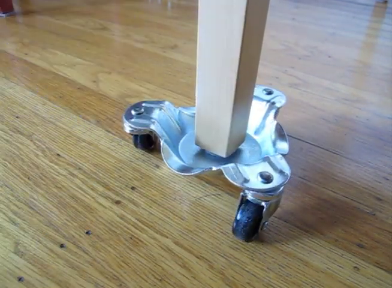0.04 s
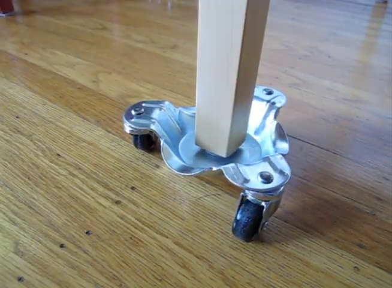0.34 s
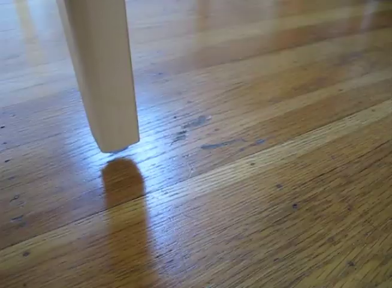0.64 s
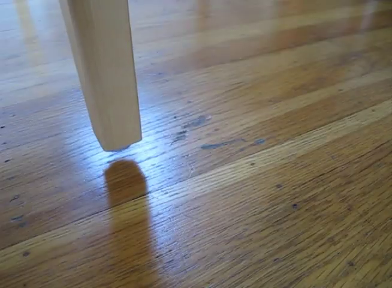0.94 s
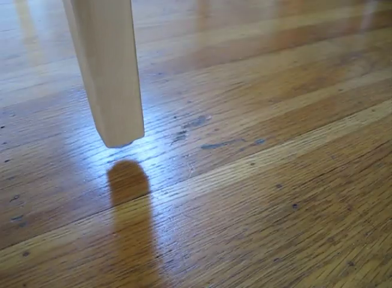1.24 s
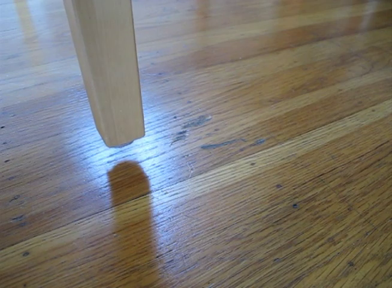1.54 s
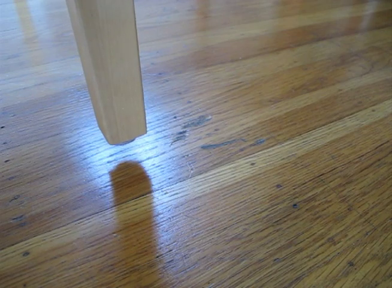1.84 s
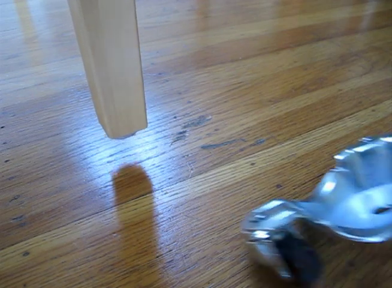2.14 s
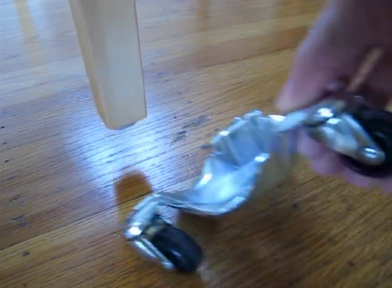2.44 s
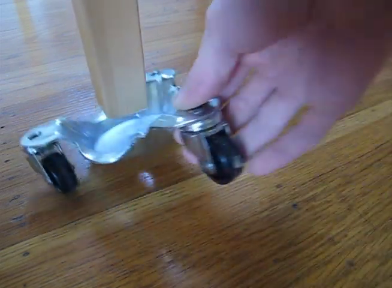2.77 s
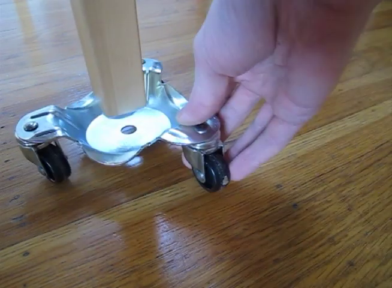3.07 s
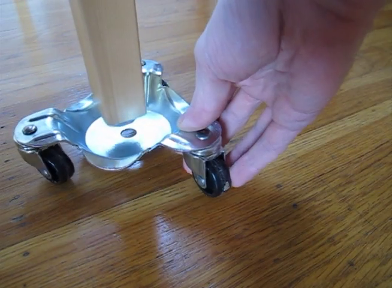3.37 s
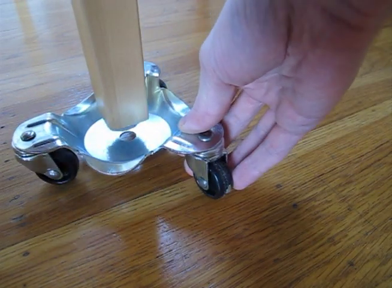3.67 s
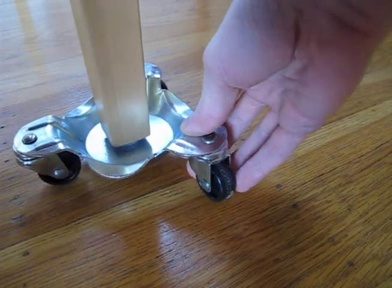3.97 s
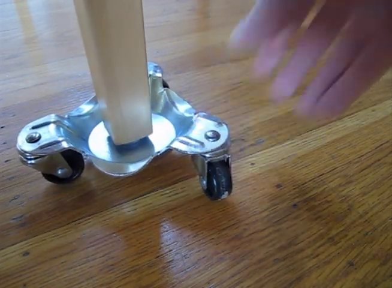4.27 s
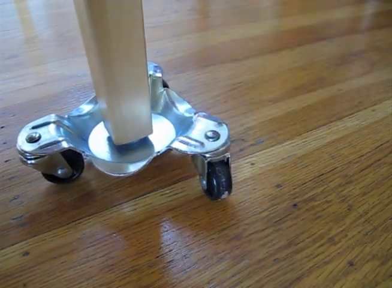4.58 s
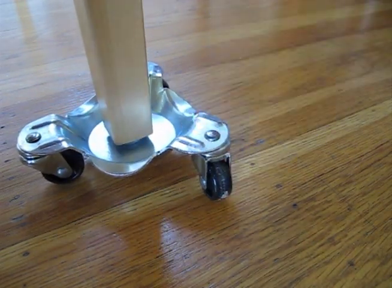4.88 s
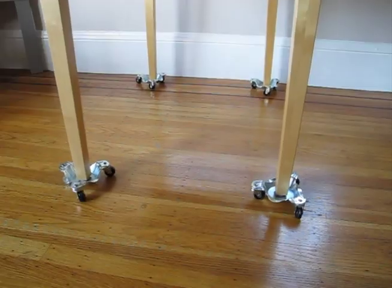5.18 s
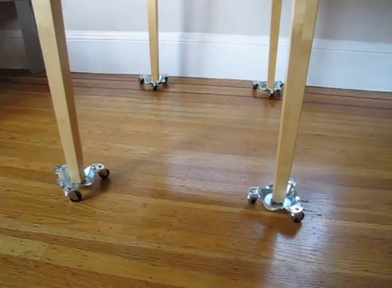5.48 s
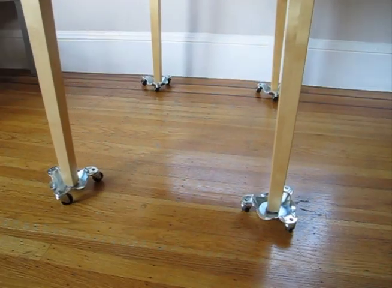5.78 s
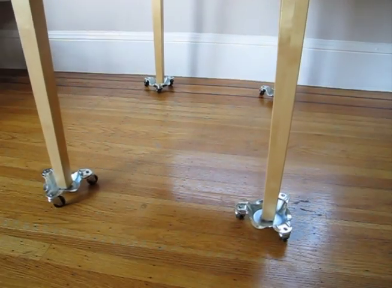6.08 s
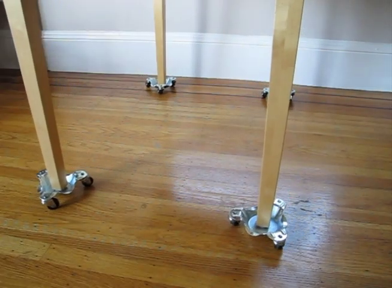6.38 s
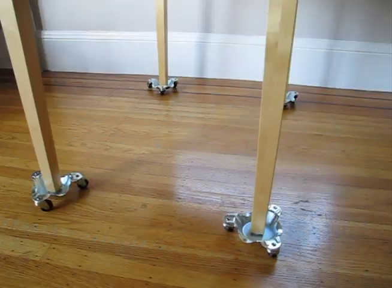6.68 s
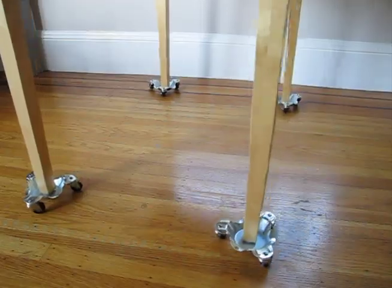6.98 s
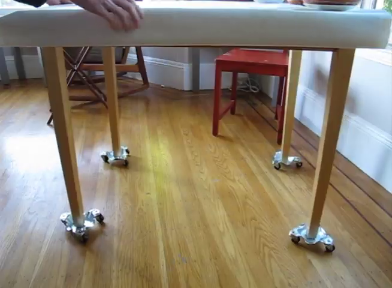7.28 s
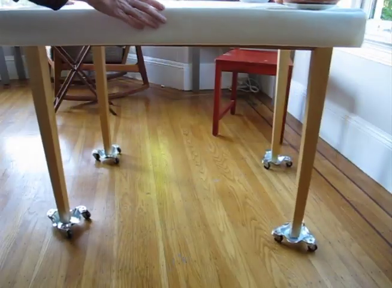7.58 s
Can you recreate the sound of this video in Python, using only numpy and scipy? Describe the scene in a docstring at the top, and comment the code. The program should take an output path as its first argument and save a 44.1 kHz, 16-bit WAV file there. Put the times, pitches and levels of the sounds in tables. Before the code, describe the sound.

Loose casters jingle against a steel plate while a little dolly is run over wooden floorboards, coming close to the microphone. It settles, and a table leg drops onto it with a knock and low thud, followed by a soft cloth swish. The table then rolls twice across the bare room, wheels droning, with a ringing crack from a swivel between the pushes.

```python
"""In a bare, quiet room, close to a small stereo microphone, a pressed-steel three-wheel dolly is picked up
and run over hardwood: wheels drum on the boards, bearings rattle, loose casters clink against the plate.
It slides under a table leg; near 4 s the leg knocks into its cup and a sleeve brushes past.
From about 5 s the table rolls away on four dollies in two pushes, droning over the boards
with gritty rolling noise, and with jolts and a sharp snap as the casters swing round."""
import sys
import numpy as np
from scipy import signal
from scipy.fft import rfft, irfft, next_fast_len
from scipy.io import wavfile
from scipy.ndimage import uniform_filter1d, map_coordinates

SR = 44100
rng = np.random.default_rng(int(sys.argv[2]) if len(sys.argv) > 2 else 0)


def transcribe(u):
    """Save the signal u as a 16-bit wav file named by the first command-line argument.

    u: samples, shape (n,) or (channels, n), limited to [-1, 1]; the rate is SR.
    q: integer samples, one column per channel.
    """
    v = np.clip(np.atleast_2d(u).T, -1, 1)
    q = np.round(v * 32767).astype(np.int16)
    wavfile.write(sys.argv[1], SR, q)


N = 340452
TIME = np.arange(N) / SR

# ringing modes: f/Hz, level/dB, t60/s
PLATE_MODES = [(7284, -4.5, 0.24), (7320, -12, 0.15), (7480, -12, 0.08), (8300, -23, 0.4), (9230, -30, 0.2),
               (11700, -37, 0.15)]  # the dolly's steel plate
CUP_MODES = [(4098, -1.5, .36), (4135, -10, .15), (4990, -12, .12)]  # the cup that takes the leg
PIN_MODES = [(7655, -3, .035), (7750, -4, .04), (8075, -4, .03), (10700, -25, .025), (11400, -24, .025)]  # a swivel pin's short ping
LEG_MODES = [(256, -12, 0.11), (311, -3, 0.23), (415, 0, 0.11), (500, 4, 0.048), (661, 1.5, 0.078),
             (750, -3, 0.11), (912, 4.5, 0.094), (1014, 1.5, 0.091), (1250, -10, 0.088), (1660, -22, 0.11)]  # the wooden table leg
# spectra under the table's weight: f/Hz, level/dB
JOIST_RUMBLE = [(20, -18), (30, -7), (42, 0), (60, -3), (85, -11), (160, -30)]
LOADED_WHEEL_KNOCK = [(250, -15), (480, -7), (680, 2), (1000, 1), (1350, 1), (1800, -1), (2300, -7),
                      (2800, -8.5), (5000, -40)]
LOADED_FORK_CLACK = [(1500, -8.5), (2600, -7), (3400, 1), (4500, -2.5), (5600, -2), (7000, -26),
                     (10000, -23)]


def undb(db):
    """Decibels to gain."""
    return 10 ** (np.asarray(db) / 20)


def unit(x):
    """Scale to rms 1."""
    return x / np.sqrt(np.mean(x ** 2))


def fade(t, t60):
    """Exponential decay, 60 dB down after t60."""
    return np.exp(-np.log(1000) * t / t60)


def gains(curve):
    """A curve's dB columns as gain envelopes, silent outside it unless it runs to the scene's end."""
    times, *columns = np.transpose(curve)
    holds = times[-1] > TIME[-1] - .1
    return [undb(np.interp(TIME, times, db, left=-120, right=db[-1] if holds else -120))
            for db in columns]


def over_time(points):
    """Points joined by straight lines, at every sample."""
    return np.interp(TIME, *np.transpose(points))


def over_hz(points, size):
    """Points joined on a log-frequency axis, at the bins of a transform."""
    hz, value = np.transpose(points)
    return np.interp(np.log(np.arange(size // 2 + 1) * SR / size + 1), np.log(hz), value)


def colour(x, points, size=4096):
    """Causal filter with the given spectrum: it rings after a blow, never before."""
    edged = [(points[0][0] / 2, points[0][1] - 30), *points, (points[-1][0] * 2, points[-1][1] - 30)]
    cepstrum = irfft(np.log(undb(over_hz(edged, size))))
    cepstrum[1:size // 2] *= 2
    cepstrum[size // 2 + 1:] = 0
    response = irfft(np.exp(rfft(cepstrum)))
    return signal.fftconvolve(x, response.reshape((1,) * (x.ndim - 1) + (-1,)))[..., :x.shape[-1]]


def resonance(x, hz, width_hz):
    """A resonance whose centre moves from sample to sample."""
    turn = np.exp(2j * np.pi * np.cumsum(hz) / SR)
    return (turn * signal.sosfilt(signal.butter(2, width_hz / 2, fs=SR, output="sos"), x / turn)).real


def add(track, s, sound):
    """Mix a sound in at a time."""
    i = int(s * SR)
    track[i:i + len(sound)] += sound[:N - i]


def walk(rate):
    """Slow random modulation at rms 1."""
    hold = int(SR / rate)
    steps = np.repeat(rng.standard_normal(N // hold + 1), hold)
    return unit(uniform_filter1d(steps, hold)[:N])


def diffuse(size, apart_hz=3000):
    """Stereo noise from all round: alike in the bass, unrelated in the treble."""
    likeness = np.exp(-(np.arange(size // 2 + 1) * SR / size / apart_hz) ** 2)
    mid, side = rfft(rng.standard_normal((2, size)))
    mid, side = mid * np.sqrt((1 + likeness) / 2), side * np.sqrt((1 - likeness) / 2)
    return irfft(np.array([mid + side, mid - side]), size)


def grains(rate, spread_db):
    """Countless small contacts, a few much harder than the rest."""
    sizes = undb(spread_db * np.minimum(rng.exponential(size=N), 4))
    return (rng.random(N) < rate / SR) * sizes * np.sign(rng.random(N) - .5)


def burst(body, db, t60):
    """Parts chatter briefly against each other and shake a body; db is the level of the attack."""
    t = np.arange(SR // 8) / SR
    attack = SR // 125
    chatter = colour(rng.standard_normal(len(t)) * fade(t, t60), body)
    energy = np.sum(chatter ** 2) * (1 - fade(attack / SR, t60) ** 2)
    return undb(db) * chatter * np.sqrt(attack / energy)


def blow(db, hardness_db, mix_db, t60s, wheel, fork):
    """One contact in four layers: board thud, wheel knock, fork clack, edge tick. Harder is brighter."""
    # floorboard and steel edge spectra: f/Hz, level/dB
    thud = [(70, -33.5), (130, -16), (200, -2), (320, 4), (480, -4), (1000, -42.5)]
    tick = [(4500, -15.5), (6600, -1), (7600, 0.5), (8300, -3.5), (9400, -15), (11500, -25), (15000, -56)]
    # each layer's response to hardness: slope/(dB per dB)
    tilt = (-0.65, -1.07, 0.29, 0.99)
    levels_db = db + np.array(mix_db) + hardness_db * np.array(tilt)
    return sum(map(burst, (thud, wheel, fork, tick), levels_db, t60s))


def ring(modes, db, scatter_db, waver_db=0., detune=0.):
    """Struck modes: the striking spot scatters their levels; loose parts make them waver and detune."""
    hz, share_db, t60 = np.transpose(modes)[:, :, None]
    hz = hz * (1 + detune * rng.standard_normal(hz.shape))
    t = np.arange(min(int(SR * t60.max()), SR // 3)) / SR
    size = undb(db + share_db + scatter_db * rng.standard_normal(hz.shape))
    waver = unit(uniform_filter1d(rng.standard_normal(len(t)), size=400))
    polarity = rng.choice([-1, 1], hz.shape)
    tone = np.sum(size * polarity * np.sin(2 * np.pi * hz * t) * fade(t, t60), axis=0)
    return np.pad(undb(waver_db * waver) * tone, (0, SR // 3 - len(t)))


def room_tail(wet_db, treble_db, build_s):
    """One stereo response of the bare room, dulling as it dies."""
    # reverb decay: f/Hz, t60/s
    decay = [(100, 0.47), (400, 0.52), (1500, 0.47), (4000, 0.47), (8000, 0.36), (15000, 0.26)]
    size = 32768
    t = np.arange(size) / SR
    noise = rfft(diffuse(size))
    band_hz, t60s = np.transpose(decay)
    tail = 0
    for band, t60 in zip(np.eye(len(decay)), t60s):
        weight = over_hz(np.column_stack([band_hz, band]), size)
        tail = tail + irfft(noise * weight) * fade(t, t60)
    onset = 1 - np.exp(-(t / build_s) ** 2)
    tail = unit(tail * onset) / np.sqrt(size)
    return irfft(rfft(tail) * undb(wet_db + over_hz([(1500, 0), (6000, treble_db)], size)))


def in_room(x, wet_db, treble_db, lag_s, build_s, distance_db=0.):
    """Movement shifts the left port's lag and the reflections; distance trades direct sound for reverb."""
    place = np.pi * TIME * 1.3
    sends = undb(distance_db / 2) * np.array([np.cos(place), np.sin(place)])
    wet = sum(signal.oaconvolve((x * send)[None], room_tail(wet_db, treble_db, build_s), axes=1)[:, :N]
              for send in sends)
    lag = lag_s + .00002 * walk(2.78)
    left = map_coordinates(x, [np.arange(N) - lag * SR], order=3)
    return np.array([left, x]) * undb(-distance_db / 2) + wet


def room_tone():
    """A bed of murmuring air and hiss, with mains hum and a thin electronic whine."""
    # air spectrum: f/Hz, level/dB
    air_spectrum = [(15, -44), (25, -17), (55, -11.5), (123, -7.5), (200, -8), (256, -11.5), (344, -13.5),
                    (416, -17), (503, -18), (560, -18.5), (911, -18.5), (1020, -21), (2000, -25),
                    (7920, -23.5), (16000, -37.5)]
    # the murmur and hiss levels over time: t/s, murmur gain/dB, hiss gain/dB
    air_levels = [(0, 3.5, 5), (.25, 3.5, 2), (.5, -2, -6), (.9, -1, -4.5), (3.1, 2, -5), (7.72, 4.5, -0.5)]
    # hum and whine: f/Hz, level/dB
    tones = [(119.5, -61.5), (8210, -70.5)]
    air = undb(-53.5) * unit(colour(diffuse(N), air_spectrum))
    murmur = signal.sosfilt(signal.butter(1, 1500, fs=SR, output="sos"), air)
    murmur_gain, hiss_gain = gains(air_levels)
    hum = sum(undb(db) * unit(np.sin(2 * np.pi * hz * TIME + 1.26 * walk(4.9))) for hz, db in tones)
    return murmur * murmur_gain * undb(walk(7)) + (air - murmur) * hiss_gain + hum


def sleeve():
    """Fibres slip over each other in a soft hiss that swells and dies with each stroke."""
    # cloth strokes: t/s, level/dB
    strokes = [(4.15, -53), (4.28, -42), (4.43, -41.5), (4.51, -46)]
    # cloth spectrum: f/Hz, level/dB
    cloth = [(1060, -17), (1800, -12), (2190, -13.5), (2680, -10), (3730, -10), (5910, 1.5), (7920, 1.5),
             (10300, -3.5), (15000, -24)]
    attack_s, release_s = .07, .14
    corners = [0, attack_s, attack_s + release_s]
    rubbing = sum(undb(db) * np.interp(TIME - s, corners, [0, 1, 0]) for s, db in strokes)
    return rubbing * undb(0.5 + 1.5 * walk(40)) * unit(colour(grains(5000, 3.2), cloth))


def leg_seating():
    """The wooden leg knocks into the cup and loads the joists; let go, the dolly rings hollowly."""
    # leg on cup: t/s, level/dB, hardness/dB
    knocks = [(3.1527, -63.5, -6.5), (3.3521, -57.5, -3.5), (3.9397, -51, -6), (3.9558, -42, -6),
              (3.9694, -38.5, -6), (3.983, -28.5, 1), (4.0283, -39, 2.5), (4.1294, -39.5, 0.5),
              (4.136, -39.5, 2), (4.155, -47, -4), (4.2653, -38, 1)]
    # their mix: thud/dB, knock/dB, clack/dB, tick/dB
    mix_db = (-1.5, .5, 1, -4)
    # the hand lets go: t/s, level/dB
    let_go = (4.2652, -42)
    # the loaded dolly's modes: f/Hz, level/dB, t60/s
    hollow_modes = [(748, 0, 0.18), (1050, -14, 0.32), (1572, -1, 0.18), (2132, -12, 0.13)]
    # weight lands on the joists: t/s, level/dB, t60/s
    bumps = [(3.952, -31, 0.19), (4.421, -38, .06)]
    out = np.zeros(N)
    t60s = (0.073, 0.037, 0.022, 0.023)
    for s, db, hardness_db in knocks:
        add(out, s, blow(db, hardness_db, mix_db, t60s, LOADED_WHEEL_KNOCK, LOADED_FORK_CLACK))
        add(out, s, ring(LEG_MODES, db - hardness_db - 11.5, scatter_db=3.0))
    s, db = let_go
    add(out, s, ring(hollow_modes, db, scatter_db=1.5))
    t = np.arange(SR // 2) / SR
    for s, db, t60 in bumps:
        sway = unit(colour(rng.standard_normal(len(t)), JOIST_RUMBLE))
        add(out, s, undb(db) * sway * fade(t, t60))
    return out


def bearing_rattle(balls):
    """Ball contacts make a bright rattle in the swivels."""
    # bearing spectrum: f/Hz, level/dB
    spectrum = [(2000, -16), (3000, -5.5), (4200, -2), (5000, 1.5), (6500, -0.5), (7600, -2), (8600, -5),
                (10000, -16), (15000, -35)]
    return unit(colour(balls, spectrum))


def push(start_s, fastest_s, rise_db_per_s=19, coast_db_per_s=12):
    """Speed as a gain: it builds while the table is pushed and ebbs as it coasts."""
    db = np.minimum(rise_db_per_s * (TIME - fastest_s), coast_db_per_s * (fastest_s - TIME))
    return (TIME > start_s) * undb(db)


def table_roll():
    """Loaded wheels drone over the wood grain; joists rumble, boards hum and bearings rattle."""
    # pushes: start/s, fastest/s, drone gain/dB, rattle gain/dB, joist gain/dB
    pushes = [(4.95, 5.38, -42, -55, -59), (7.098, 7.6, -38.5, -37.5, -45)]
    # wheel drone: f/Hz, level/dB
    drone_spectrum = [(110, -31), (200, -6), (300, 1), (400, 0), (600, -2), (950, -7), (1500, -11.5),
                      (2500, -21), (5000, -36)]
    # board resonances: f/Hz, width/Hz, level/dB
    board_hums = [(255, 70, -12), (335, 100, -5)]
    rumble = drone = rattle = 0
    for start_s, fastest_s, drone_db, rattle_db, joist_db in pushes:
        speed = push(start_s, fastest_s)
        drone = drone + undb(drone_db) * speed
        rattle = rattle + undb(rattle_db) * speed
        rumble = rumble + undb(joist_db) * speed ** 1.4  # the joists follow speed more steeply
    out = rumble * undb(-3.0) * unit(colour(rng.standard_normal(N), JOIST_RUMBLE))
    out += drone * undb(-8.0 + 2.1 * walk(18)) * unit(colour(grains(500, 3.2), drone_spectrum))
    for hz, width_hz, db in board_hums:
        rolling = colour(grains(900, 2.6), drone_spectrum)
        pitch_hz = hz * (1 + .09 * walk(6))  # wanders from board to board
        out += drone * undb(db - 4.5 + 2.5 * walk(11)) * unit(resonance(rolling, pitch_hz, width_hz))
    return out + rattle * undb(-6.5 + 2.0 * walk(30)) * bearing_rattle(grains(2500, 1.9))


def table_jolts():
    """Casters jolt and ring the leg, flip round with a hollow clunk, and bump over board seams."""
    # caster jolts: t/s, level/dB, hardness/dB
    jolts = [(4.8273, -52, -3), (5.182, -51, -6.5), (5.2117, -31, 1), (5.2176, -36.5, 3.5),
             (5.5374, -52, -8), (5.5926, -50, -2), (5.687, -44, 3), (5.7312, -50, 2.5), (5.7732, -45, 2.5),
             (6.97, -54, -7), (7.095, -56, 4), (7.2197, -35.5, -2), (7.5347, -41, 2)]
    # their mix: thud/dB, knock/dB, clack/dB, tick/dB
    mix_db = (-10, .5, -.5, -4.5)
    # stalled casters flipping, wheels crossing seams: t/s, level/dB
    flips = [(7.1186, -28), (7.1262, -24.5)]
    seams = [(5.36, -46), (5.405, -44), (5.592, -44), (5.63, -46), (5.862, -43), (5.888, -43)]
    # their spectra: f/Hz, level/dB
    flip_clunk = [(200, -10), (420, -10), (650, 1), (1400, 0), (2200, -4), (3100, -12), (4200, -23),
                  (5600, -14), (7300, -6), (9000, -17), (14000, -38)]
    seam_bump = [(110, -22), (190, -2), (300, 1), (400, 1), (600, -2), (800, -14), (1500, -30)]
    out = np.zeros(N)
    t60s = (0.031, 0.028, 0.019, 0.032)
    for s, db, hardness_db in jolts:
        add(out, s, blow(db, hardness_db, mix_db, t60s, LOADED_WHEEL_KNOCK, LOADED_FORK_CLACK))
        add(out, s, ring(LEG_MODES, db - hardness_db - 21.0, scatter_db=3.0))
    for s, db in flips:
        add(out, s, burst(flip_clunk, db, t60=.03))
    for s, db in seams:
        add(out, s, burst(seam_bump, db, t60=.05))
    return out


def grit_swells():
    """Gritty rolling noise that starts abruptly and dies away."""
    # swells: t/s, level/dB, t60/s
    swells = [(4.947, -41.5, 0.76), (7.281, -33, 0.5)]
    # grit spectrum: f/Hz, level/dB
    spectrum = [(400, 4), (1400, 2), (2500, -2.5), (5000, 0), (7500, -0.5), (9500, -10), (14500, -27)]
    grit = unit(colour(grains(6000, 3.4), spectrum))
    return grit * sum((TIME > s) * undb(db) * fade(np.abs(TIME - s), t60) for s, db, t60 in swells)


def swivel_snap():
    """A loaded swivel snaps round with a crack that rings plate and fork."""
    # the snap: t/s, crack/dB, plate ring/dB, fork ring/dB
    snap = (6.1032, -25, -29.5, -43)
    # crack spectrum: f/Hz, level/dB
    crack = [(300, -8), (1000, -13), (1900, -10), (2600, -4.5), (3900, 2), (4900, -2), (5700, -7.5),
             (7200, -5), (8900, -5), (9600, -15), (10700, -7), (12500, -30), (15500, -39)]
    # the loaded fork's ring: f/Hz, level/dB, t60/s
    fork_modes = [(2600, -10, .1), (3765, -4, .14), (3940, -1, .13), (4950, -5, .13)]
    s, crack_db, plate_db, fork_db = snap
    out = np.zeros(N)
    add(out, s, burst(crack, crack_db, t60=0.034))
    add(out, s, ring(PLATE_MODES, plate_db, scatter_db=2.0))
    add(out, s, ring(fork_modes, fork_db, scatter_db=1.0, waver_db=1.5))
    return out


def dolly_roll():
    """Light wheels drum and scrape on the boards; rattling balls keep cup, plate and pins jingling."""
    # the hand runs the empty dolly: t/s, effort/dB, pressure/dB
    gesture = [(.94, -56, 7), (1.36, -51, 3), (1.47, -37, 3), (1.68, -36.5, 2), (1.84, -31, -3),
               (1.98, -41.5, 0), (2.3, -39.5, 1), (2.43, -38.5, 6), (2.84, -44, 8), (3.06, -74, 10)]
    # drumming and scraping spectra: f/Hz, level/dB
    boards = [(80, -23), (140, -13), (195, 0), (310, -2), (380, -5), (480, -24), (800, -46)]
    grit = [(350, -8.5), (620, 3.5), (740, -5), (930, 5.5), (1080, -4.5), (1340, -2), (1600, -3),
            (1950, -2), (2600, -6.5), (4500, -10.5)]
    # falling resonances: t/s, f/Hz
    board_pitch = [(1.45, 290), (2.8, 205)]  # as the dolly crosses the boards
    wheel_pitch = [(1.45, 2050), (1.7, 1950), (1.8, 1330), (2.25, 1280), (2.4, 980), (2.9, 990)]  # as it is tipped on a scraping wheel
    effort = gains(gesture)[0]
    times, _, pressure = np.transpose(gesture)
    pressure_db = np.interp(TIME, times, pressure)
    # pressure drums the boards and takes the play out of the bearings
    rumble, rattle = effort * undb(pressure_db), effort * undb(-1.2 * pressure_db)
    boom = unit(resonance(colour(grains(900, 2.4), boards), over_time(board_pitch), width_hz=80))
    flutter = undb(-3.0 + 1.8 * walk(24.92))
    drumming = unit(colour(grains(600, 2.5), boards))
    out = rumble * flutter * (drumming + undb(-3.0) * boom)
    shake = walk(45.24)
    tipped = TIME > wheel_pitch[0][0]
    dragging = tipped * unit(resonance(grains(1500, 3.4), over_time(wheel_pitch), width_hz=360))
    scrape = unit(colour(grains(1500, 4.3), grit)) + undb(1.5) * dragging
    out += effort * undb(-4.2 + 2.4 * shake) * scrape
    balls = grains(700, 3.6)
    out += rattle * undb(-6.0 + 3.5 * shake) * bearing_rattle(balls)
    steel = sum(ring(modes, db, scatter_db=2)
                for modes, db in [(CUP_MODES, -15), (PLATE_MODES, -8), (PIN_MODES, 0)])
    jingle = unit(signal.oaconvolve(balls, steel)[:N])
    return out + rattle ** .8 * undb(-15) * jingle


def dolly_clinks():
    """Loose forks strike the plate; each hit rings plate, cup, swivel pin and wheel housing."""
    # hits: t/s, level/dB, hardness/dB, plate/dB, cup/dB, pin/dB, housing/dB
    clinks = [(0.7583, -56, 0, -65, -75, -70, -70), (0.936, -35.5, 4, -22.5, -60, -36, -38),
              (1.098, -44, -1, -44, -50, -55, -50), (1.1524, -40, -4, -50, -52, -40, -50),
              (1.239, -34.5, -1, -30, -33, -38, -41), (1.422, -38, -1, -48, -41, -50, -44),
              (1.4933, -39, 0, -52, -50, -50, -38), (1.5157, -32, -6, -38, -52, -48, -22),
              (1.525, -27, -1, -34, -44, -29, -19), (1.7, -32, -2, -44, -46, -46, -38),
              (1.7176, -30, 0, -50, -38, -46, -36), (1.7575, -28.5, -3.5, -44, -38, -40, -40),
              (1.777, -24, -5, -33, -42, -32, -36), (1.785, -25, -1, -33, -44, -30, -40),
              (1.7966, -26, 3, -26, -44, -19, -38), (1.8095, -27, 2, -34, -46, -23, -36),
              (1.8514, -31, 4, -31, -44, -28, -40), (1.875, -33, 0, -44, -42, -32, -38),
              (1.903, -34, 1, -46, -46, -34, -42), (1.9512, -38, 2, -50, -52, -36, -48),
              (2.004, -28, -9, -46, -48, -44, -25), (2.011, -27, -8, -42, -50, -36, -25),
              (2.0186, -22.5, -1.5, -38, -46, -20, -23), (2.028, -25, 0.5, -45, -50, -26, -34),
              (2.167, -33, -1, -50, -46, -30, -30), (2.219, -22, 3, -20, -44, -30, -36),
              (2.243, -33, 1, -48, -54, -36, -40), (2.3018, -28, 4, -48, -52, -32, -38),
              (2.3526, -30, 2, -48, -52, -46, -42), (2.3785, -27, -1, -52, -50, -28, -32),
              (2.437, -33.5, 0, -50, -52, -42, -44), (2.4508, -32.5, 0, -46, -52, -42, -42),
              (2.4815, -30.5, 3, -48, -52, -32, -40), (2.524, -37, 1, -54, -54, -48, -44),
              (2.553, -24, 3, -24, -31.5, -34, -36), (2.6496, -28, 2, -31, -44, -24, -34),
              (2.661, -31, 3, -38, -48, -19, -36), (2.6948, -28.5, 4, -38, -42, -26, -34),
              (2.7553, -26, 3, -29, -42, -24, -24), (2.8142, -32, 3, -52, -54, -18, -26)]
    # their mix: thud/dB, knock/dB, clack/dB, tick/dB
    mix_db = (-15, -1.5, 3.5, 2)
    # unloaded caster spectra: f/Hz, level/dB
    wheel_knock = [(250, -17), (500, -7), (670, 2), (900, -2), (1350, 1), (1650, -2), (2000, -1),
                   (2750, -5), (3300, -13), (5000, -40)]
    fork_clack = [(1500, -63), (2700, -7), (3600, -2.5), (5000, 2), (6300, 2.5), (7200, -35),
                  (10000, -35.5)]
    # the housing's hollow tock: f/Hz, level/dB, t60/s
    housing_modes = [(1200, -7, .03), (1450, -8, .025), (1780, -2, .022), (1940, -1, .028), (2120, -3, .02)]
    out = np.zeros(N)
    t60s = (0.05, 0.04, 0.014, 0.018)
    for s, db, hardness_db, plate_db, cup_db, pin_db, housing_db in clinks:
        add(out, s, blow(db, hardness_db, mix_db, t60s, wheel_knock, fork_clack))
        add(out, s, ring(PLATE_MODES, plate_db, scatter_db=1.5, waver_db=1.2))
        add(out, s, ring(CUP_MODES, cup_db, scatter_db=1.5, waver_db=2.2))
        add(out, s, ring(PIN_MODES, pin_db, scatter_db=3.0, detune=.012))
        add(out, s, ring(housing_modes, housing_db, scatter_db=2.5, detune=.04))
    return out


def scene():
    """Close work on the dolly, then the table further off, over the room tone."""
    # the dolly comes nearer: t/s, extra reverb over direct sound/dB
    approach = [(1.2, 5), (1.85, 3), (2.2, -1)]
    near = in_room(dolly_roll() + dolly_clinks(), wet_db=-7.5, treble_db=-5.0, lag_s=.00008,
                   build_s=0.0012, distance_db=over_time(approach))
    leg = in_room(leg_seating() + sleeve(), wet_db=-3, treble_db=-1, lag_s=.00001, build_s=0.0026)
    table = table_roll() + table_jolts() + grit_swells() + swivel_snap()
    far = in_room(table, wet_db=0, treble_db=-1.0, lag_s=.00003, build_s=0.0044)
    return near + leg + far + room_tone()


def record(dry):
    """Each microphone port colours the sound; the hardest peaks are clipped and the top is cut."""
    # port EQ, duller on the left: f/Hz, left/dB, right/dB
    port_eq = [(100, -1, 1), (1200, -1.6, 1.3), (2500, -1.6, 1), (5600, .2, -.3), (6500, -3.5, 1.5),
               (7400, -11.5, 2.7), (9500, -11.5, 2.7), (14000, -4, 1.5)]
    top_hz = 16100
    size = 2 * next_fast_len(N // 2 + SR // 20, True)
    response = np.array([undb(over_hz(np.array(port_eq)[:, [0, side]], size)) for side in (1, 2)])
    coloured = irfft(rfft(dry, size) * response, size)[:, :N]
    clipped = np.clip(coloured, -.8, .8)
    return signal.sosfilt(signal.ellip(8, .2, 70, top_hz, fs=SR, output="sos"), clipped)


dry = scene()
out = record(dry)
transcribe(out)
```